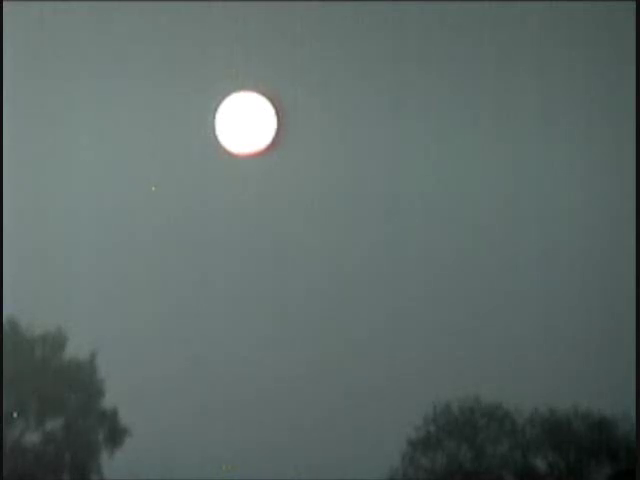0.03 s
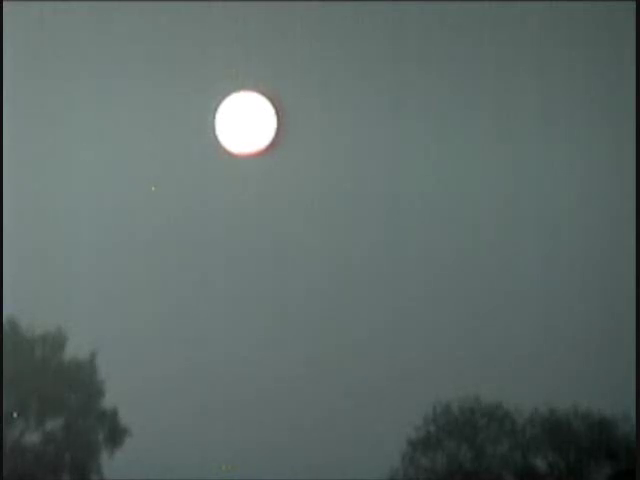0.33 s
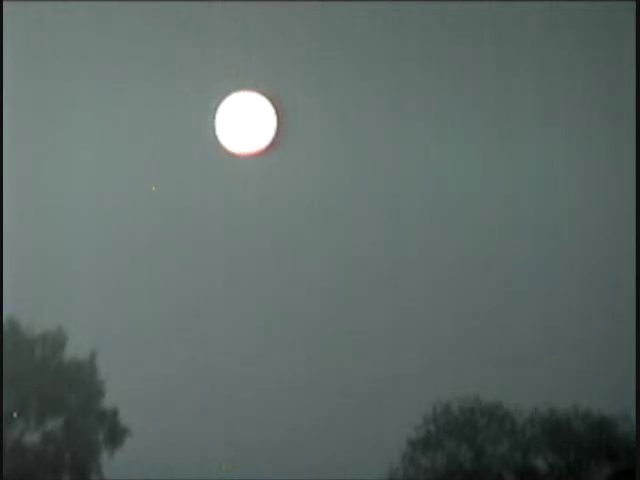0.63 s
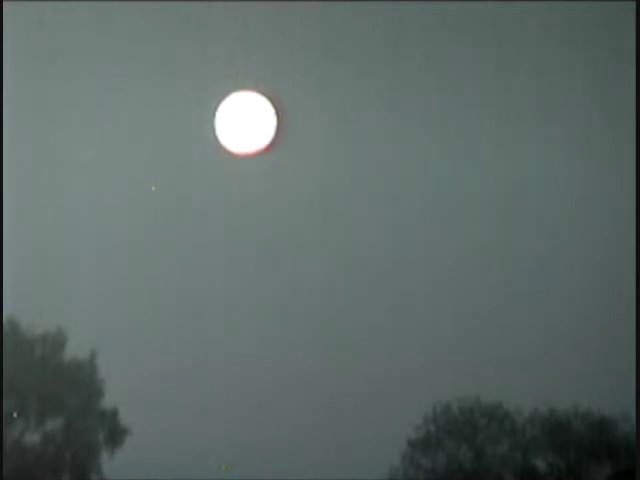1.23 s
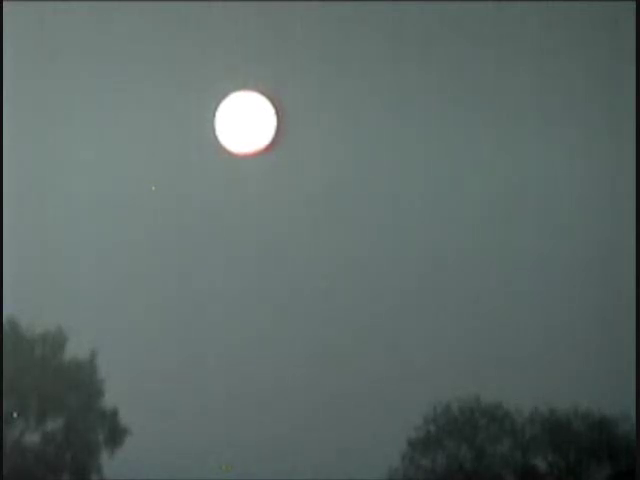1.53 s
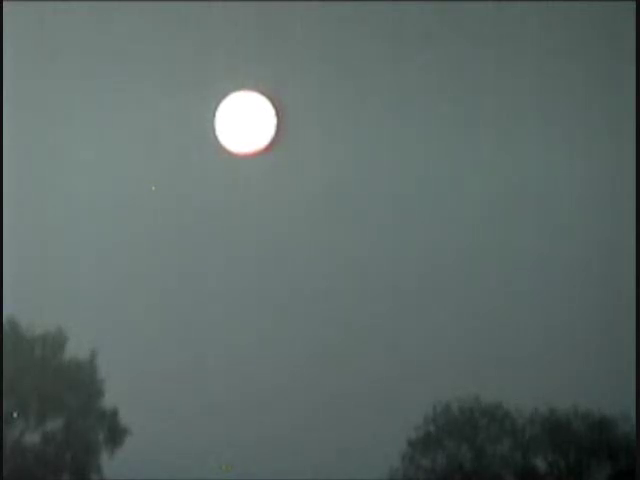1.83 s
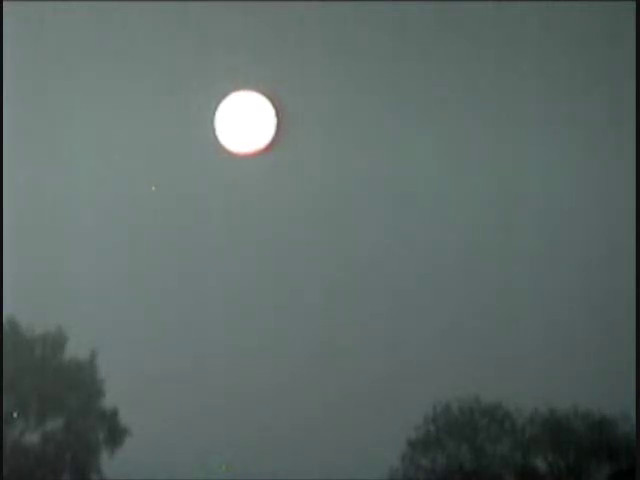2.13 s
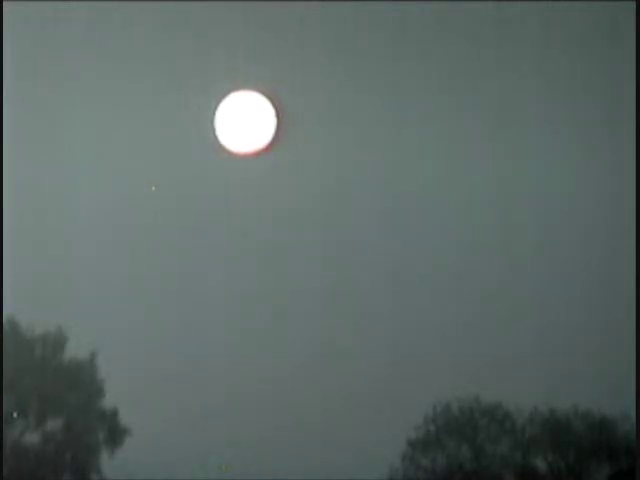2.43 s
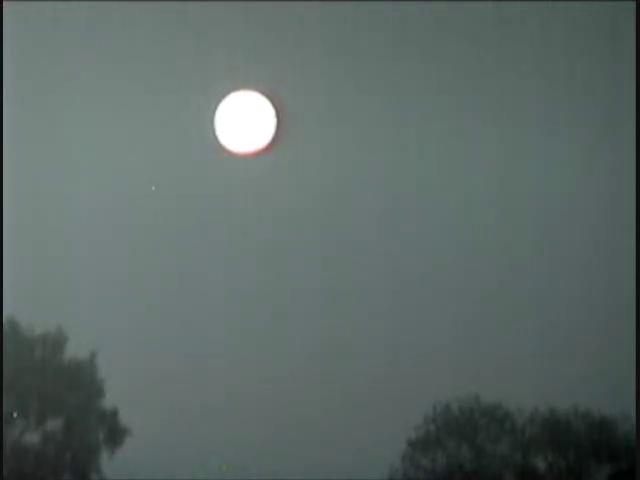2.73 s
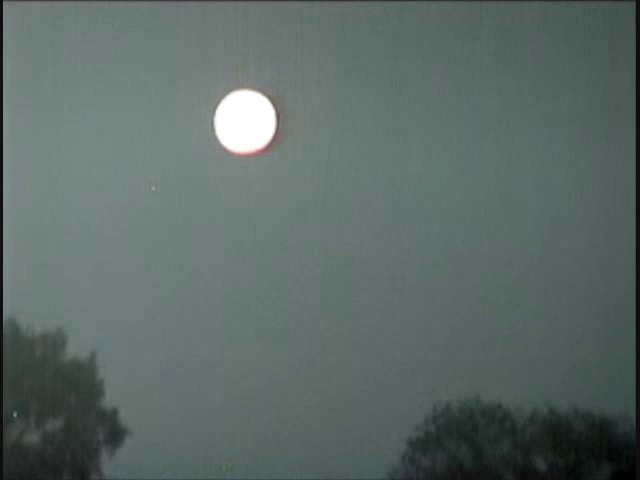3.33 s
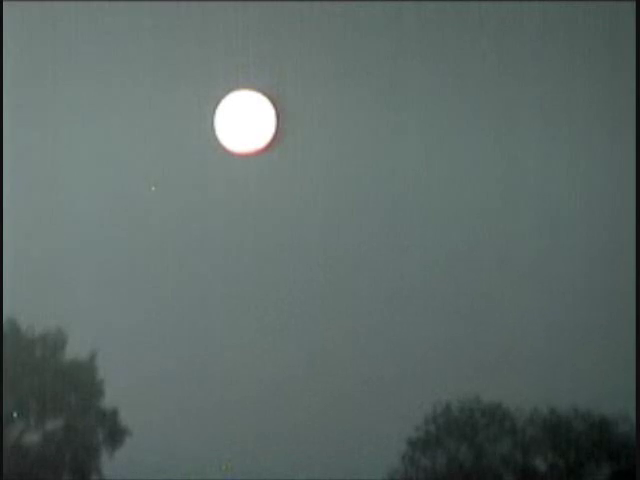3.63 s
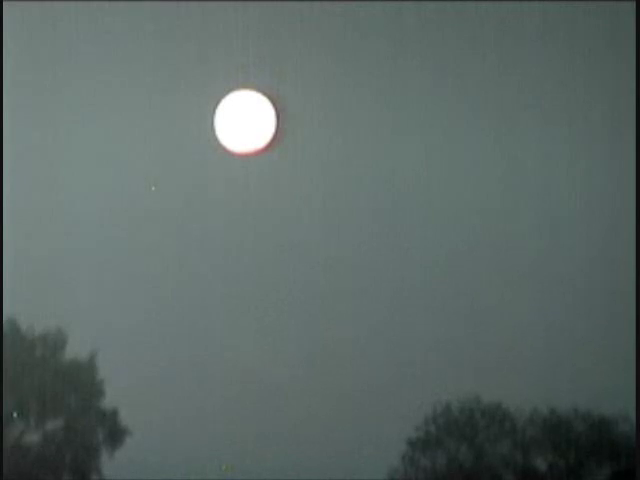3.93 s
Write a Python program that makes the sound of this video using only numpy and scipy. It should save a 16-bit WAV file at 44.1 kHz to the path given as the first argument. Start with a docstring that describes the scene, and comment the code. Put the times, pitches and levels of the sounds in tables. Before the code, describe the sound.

Frogs and insects buzz, whistle and trill over a dense distant chorus at night.

```python
"""Night chorus of frogs and insects

A near caller in the bush buzzes in loud bursts of falling chirps, and farther ones answer. Frogs whistle
and bloop in rising sweeps, trill in throat pulses and croak over a dense distant chorus; a far bird holds
one long hoot. Vegetation scatters the calls. Three low pops hit the microphone, and the narrow-band
recorder hums and limits the loudest bursts."""
import sys
import numpy as np
from scipy import signal
from scipy.fft import rfft, irfft, next_fast_len
from scipy.io import wavfile
from scipy.ndimage import uniform_filter1d, map_coordinates

SR = 44100
rng = np.random.default_rng(int(sys.argv[2]) if len(sys.argv) > 2 else 0)


def int16_out(signal):
    """Quantize to a 16-bit WAV file."""
    q = np.round(np.clip(np.atleast_2d(signal).T, -1, 1) * 32767)
    wavfile.write(sys.argv[1], SR, q.astype(np.int16))


N = 176400

# Slow envelopes of the low and high bands of the distant chorus: time_s, level_db
LOW_ENVELOPE = [(0, -45), (.3, -31.5), (.55, -25), (1.25, -32), (1.75, -35), (2.15, -31), (2.36, -35),
                (2.55, -25.5), (2.68, -36.5), (3.2, -30.5), (3.7, -28.5), (4, -25)]
HIGH_ENVELOPE = [(0, -27), (.2, -24.5), (.3, -19.5), (.5, -27), (.57, -20), (.7, -24.5), (.78, -22),
                 (.98, -24.5), (1.13, -24.5), (1.62, -24.5), (1.95, -28.5), (2.15, -21.5), (2.43, -22),
                 (2.52, -26), (2.72, -22), (3.1, -26.5), (3.43, -23), (3.6, -26.5), (4, -21)]
CHIRP_S, CHIRP_FALL_HZ = .0105, 553  # a narrow chirp
BLOOP_S = .075


def amp(db):
    """Amplitude ratio: tenfold for every 20 decibels."""
    return 10 ** (np.asarray(db) / 20)


def unit(x):
    """Normalisation to rms 1."""
    return x / np.sqrt(np.mean(x ** 2) + 1e-20)


def curves(rows):
    """Linear interpolation: one value per sample for each column after the time."""
    times, *columns = np.transpose(rows)
    return [np.interp(np.arange(N) / SR, times, column) for column in columns]


def wobble(rate):
    """Smooth random modulation: a spline through `rate` knots a second."""
    knots = rng.standard_normal(int(N * rate / SR) + 4)
    return map_coordinates(knots, [np.arange(N) * rate / SR])


def filtered(x, response):
    """Linear filtering: the spectrum is multiplied by a frequency response."""
    size = next_fast_len(N + SR // 2)
    return irfft(rfft(x, size) * response(np.fft.rfftfreq(size, 1 / SR)), size)[:N]


def noise(spectrum):
    """Spectral shaping of white noise, at rms 1; rows are frequency_hz, level_db."""
    knots_hz, db = np.transpose(spectrum)

    def response(hz):
        return amp(np.interp(np.log(hz + 1), np.log(knots_hz), db, right=-120))
    return unit(filtered(rng.standard_normal(N), response))


def ramp(length_s):
    """Normalised time: 0 to 1 over a duration."""
    return np.linspace(0, 1, max(int(length_s * SR), 8))


def arch(u, power):
    """A half-sine envelope, narrower at higher powers."""
    return np.abs(np.sin(np.pi * u)) ** power


def tone(hz):
    """A sine whose phase is the integral of its frequency."""
    return np.sin(2 * np.pi * np.cumsum(hz) / SR)


def add(out, start_s, sound):
    """Superposition: a sound joins the mix at a given time."""
    i = int(np.clip(round(start_s * SR), 0, N))
    out[i:i + len(sound)] += sound[:N - i]


def chorus_band(envelope, spectrum, flutter_db, flutter_rate):
    """Incoherent summation: many far callers merge into a fluttering band of noise."""
    db, = curves(envelope)
    return amp(db) * unit(noise(spectrum) * amp(flutter_db * wobble(flutter_rate)))


def distant_chorus():
    """Amplitude modulation: three bands of far callers swell and fade independently."""
    # Band spectra: frequency_hz, level_db
    low_spectrum = [(500, -34.5), (680, -6), (780, -4.5), (1100, -2), (1600, -2), (1950, -7.5), (2300, -12),
                    (3000, -43.5)]
    mid_spectrum = [(2000, -25), (2400, -5), (2650, -2.5), (3000, -1.5), (3300, -6.5), (3700, -41)]
    high_spectrum = [(3000, -40.5), (3500, -6.5), (4050, 3), (4500, -2.5), (5050, -3.5), (5450, -8.5),
                     (5750, -7.5), (6150, -17.5)]
    # Slow envelope of the middle band: time_s, level_db
    mid_envelope = [(0, -24.5), (.4, -26), (.6, -34.5), (.82, -24), (1.05, -25.5), (1.22, -23.5),
                    (1.35, -29.5), (1.78, -26.5), (2.45, -29), (3.7, -26.5), (4, -27.5)]
    low = chorus_band(LOW_ENVELOPE, low_spectrum, flutter_db=4.5, flutter_rate=90)
    mid = chorus_band(mid_envelope, mid_spectrum, flutter_db=3, flutter_rate=40)
    high = chorus_band(HIGH_ENVELOPE, high_spectrum, flutter_db=1.5, flutter_rate=160)
    return low + amp(.5) * mid + amp(-1.5) * high


def far_bloops(per_s=45, gain_db=-7.5):
    """Random superposition of small rising notes under the envelope of the low chorus."""
    out, u = np.zeros(N), ramp(BLOOP_S / 2)
    for when, pitch, size in rng.random((int(per_s * N / SR), 3)):
        hz = 700 * 2.4 ** pitch * (1 + .22 * u)
        add(out, when * N / SR, (.5 + size) * arch(u, .7) * tone(hz))
    db, = curves(LOW_ENVELOPE)
    return amp(db + gain_db) * unit(out)


def far_chirps(per_s=220, gain_db=-3.5):
    """Random superposition of falling chirps under the envelope of the high chorus."""
    out, u = np.zeros(N), ramp(CHIRP_S)
    for when, pitch, size in rng.random((int(per_s * N / SR), 3)):
        hz = 4800 + 700 * pitch - CHIRP_FALL_HZ * u
        add(out, when * N / SR, size ** 2 * arch(u, .8) * tone(hz))
    db, = curves(HIGH_ENVELOPE)
    return amp(db + gain_db) * unit(out)


def mains_hum():
    """Steady partials near the mains frequency and its next two harmonics."""
    # Hum partials: frequency_hz, level_db
    partials = [(49.5, -46.5), (100, -48), (150, -50.5)]
    return sum(np.sqrt(2) * amp(db) * tone(np.full(N, hz)) for hz, db in partials)


def night_air(level_db=-36):
    """Stationary broadband noise, strongest in the bass."""
    # Spectrum of the air: frequency_hz, relative_db
    spectrum = [(20, -14), (50, 4), (90, -16.5), (200, -5.5), (1000, -10.5), (2000, -12.5), (4000, -17.5),
                (5800, -29)]
    return amp(level_db) * noise(spectrum)


def chirp(top_hz, wide):
    """Frequency sweep: a narrow chirp (wide=0) arches; a wide one (1) falls far, weakens and splits."""
    wide_s, wide_fall_hz, wide_lift_hz, sag_db = .0185, 998, 293, 6
    crest_at, break_at, break_width = .32, .55, .07  # shares of the chirp's length
    u = ramp(CHIRP_S + wide * (wide_s - CHIRP_S))
    narrow_fall = CHIRP_FALL_HZ * ((u - crest_at) / (1 - crest_at)) ** 2
    wide_fall = wide_fall_hz * arch(np.minimum(1.15 * u, 1) ** 1.4 / 2, 2) - wide_lift_hz
    gap = np.exp(-((u - break_at - rng.normal(0, .04)) / break_width) ** 2)
    envelope = (1 - wide) * arch(u, 1.4) + wide * arch(u, .76) * amp(-sag_db * u)
    return envelope * (1 - wide * gap) * tone(top_hz - (1 - wide) * narrow_fall - wide * wide_fall)


def buzzes():
    """Fast chirp trains fuse into buzzes; the fainter the caller, the greater its share of scatter."""
    # Bursts: start_s, end_s, chirps_per_s, level_db, top_pitch_hz, half_widened_at_s
    bursts = [(.0275, .19, 58.4, -1, 5020, .4), (1.2385, 1.578, 57.6, 3, 5030, 1.38),
              (2.8388, 3.005, 58, 3, 5020, 3.2), (3.152, 3.385, 58.1, 3, 5000, 3.18),
              (.232, .43, 58, -15, 5250, .6), (.545, .722, 63, -13, 5050, .6),
              (.856, 1.08, 60.3, -12, 5300, .98), (2.062, 2.245, 63.3, -13, 5200, 2.18),
              (2.269, 2.458, 61, -11, 5170, 2.33), (3.39, 3.488, 60, -12, 5150, 3.42),
              (3.835, 4, 57, -14, 5100, 3.93)]
    warm_s, warm_db, warm_hz = .024, 12.5, 403  # a burst starts soft and low
    widen_s, wide_lead_s = .08, .00028  # a wide chirp starts slightly earlier
    gain_db, jitter_hz = 2.5, 25
    out = np.zeros(N)
    for start, end, rate, db, top_hz, widen_at in bursts:
        burst = np.zeros(N)
        for s in np.arange(start, end, 1 / rate):
            cold = np.exp(-((s - start) / warm_s) ** 2)
            wide = np.clip(.5 + (s - widen_at) / widen_s, 0, 1)
            note = chirp(top_hz - warm_hz * cold + rng.normal(0, jitter_hz), wide)
            gain = amp(gain_db + db - warm_db * cold + rng.normal(0, .91))
            add(burst, s - wide_lead_s * wide, gain * note)
        out += bush(burst, wet_db=-18 - .65 * db)
    return out


def reflected(x):
    """Comb filtering: echoes off the ground and a trunk interfere with the direct sound."""
    # Echo paths: delay_s, gain
    echoes = [(.0031, .17), (.0078, .14)]
    out = x.copy()
    for delay_s, gain in echoes:
        add(out, delay_s, gain * x)
    return out


def bush(x, wet_db, t60_s=.11, build_s=.012):
    """Scattering by vegetation adds a short, exponentially decaying tail to the direct sound."""
    t = np.arange(SR // 2) / SR
    tail = rng.standard_normal(len(t)) * amp(-60 * t / t60_s) * (1 - np.exp(-t / build_s))
    return x + amp(wet_db) * signal.fftconvolve(x, tail / np.linalg.norm(tail))[:N]


def ticks(top_hz=6043, fall_hz=1090, length_s=.02, lead_s=.0079, gain_db=1.5):
    """Linear downward sweeps: another caller's higher chirps, spaced widely enough to be heard singly."""
    # Single chirps: time_s, level_db
    calls = [(0.1448, -18.5), (0.198, -14.5), (0.2622, -16), (0.2978, -18), (0.3406, -16.5), (0.378, -15),
             (0.8593, -17), (0.8883, -17.5), (0.915, -20), (0.9483, -17), (0.9872, -13), (1.0241, -14.5),
             (1.0698, -18.5), (1.6203, -19), (1.6675, -17.5), (2.03, -16.5), (2.0634, -14), (2.1, -17.5),
             (2.1405, -17.5), (2.1807, -18), (2.2216, -14.5), (2.5676, -18), (2.5949, -20), (2.6243, -16),
             (2.6624, -17), (2.702, -18), (2.7402, -17.5), (2.7834, -17), (3.4161, -14), (3.457, -16.5),
             (3.9693, -18), (3.9944, -19.5)]
    out, u = np.zeros(N), ramp(length_s)
    for s, db in calls:
        add(out, s - lead_s, amp(db + gain_db) * arch(u, 1.6) * tone(top_hz - fall_hz * u))
    return out


def whistle(length_s, hz, rise_hz=320):
    """A rising glide, loudest early, roughened by fast random amplitude modulation."""
    u = ramp(length_s)
    envelope = arch(u ** .57, 1.5) * amp(1.7 * wobble(260)[:len(u)])
    return envelope * tone(hz + rng.normal(0, 35) + rise_hz * (u ** .664 - .55))


def whistles(near_hz=2573, far_hz=2824, far_per_s=18):
    """Superposition of whistling frogs: a few near calls and many faint ones at random times."""
    # Near whistles: start_s, length_s, level_db
    calls = [(0.176, 0.056, -10.5), (0.533, 0.056, -17), (0.821, 0.062, -10), (1.195, 0.06, -19.5),
             (1.504, 0.049, -12.5), (1.74, 0.06, -20), (2.132, 0.055, -10), (3.078, 0.05, -10),
             (3.784, 0.042, -9.5), (3.936, 0.052, -19.5)]
    out = np.zeros(N)
    for s, length_s, db in calls:
        add(out, s, amp(db + 1) * whistle(length_s, near_hz))
    for when, pitch, size in rng.random((int(far_per_s * N / SR), 3)):
        add(out, when * N / SR, amp(-28 + 6.3 * size) * whistle(.055, far_hz + 400 * (pitch - .5)))
    return out


def trills(longest_pulse_s=.024):
    """Pulsed excitation of one throat resonance; each train of rounded pulses swells and fades."""
    # Pulse trains: first_pulse_s, end_s, pulses_per_s, pitch_hz, level_db, roughness (0 to 1)
    trains = [(.325, 1.31, 33.3, 1048, -18.5, .25), (2.234, 2.464, 37.4, 1204, -3.5, 0.06),
              (2.487, 2.616, 38, 797, -17.5, 0.3), (2.714, 2.857, 75, 767, -18.5, 0.1),
              (2.881, 3.277, 72, 771, -19, 0.2), (3.26, 3.335, 41, 777, -16.5, 0.2),
              (3.351, 3.619, 47.7, 1192, -18.5, 0.4)]
    out = np.zeros(N)
    for start, end, rate, hz, db, rough in trains:
        u = ramp(min(longest_pulse_s, 1.1 / rate))
        for s in np.arange(start, end, 1 / rate):
            progress = (s - start + .018 / rate) / (end - start + .5 / rate)
            swell = arch(progress ** .73, .38)
            detune = .13 * rough * rng.normal()
            glide = .3 * rough * rng.normal() * (u - .5)
            pulse = arch(u, 1.2) * tone(hz * (1 + detune + glide))
            add(out, s - len(u) / SR / 2, amp(db + rng.normal(0, 1.5)) * swell * pulse)
    return out


def bloops(from_hz=880, to_hz=2152, flutter_db=4.4):
    """Fast upward sweeps of more than an octave sound liquid; their level flutters at random."""
    # Bloops: start_s, level_db
    calls = [(.352, -28), (.428, -19.5), (0.558, -26.5), (1.098, -20), (1.236, -29.5), (1.44, -24.5),
             (1.746, -31), (1.884, -22.5), (2.083, -25), (2.4, -22), (2.5, -21), (3.428, -26), (3.811, -30),
             (3.915, -21.5)]
    out, u = np.zeros(N), ramp(BLOOP_S)
    for s, db in calls:
        add(out, s, amp(db) * arch(u, .29) * tone(from_hz + (to_hz - from_hz) * u ** 1.15))
    return out * amp(flutter_db * wobble(210))


def croaks(pulse_depth=.46):
    """Source and filter: pulsing breath noise in a broad throat resonance makes a hoarse, far croak."""
    # Croaks: start_s, end_s, pulses_per_s, resonance_hz, width_hz, level_db
    calls = [(.45, 1.05, 34, 1300, 820, -24.5), (1.38, 1.774, 45, 1093, 770, -24),
             (1.568, 1.976, 120, 3990, 794, -25), (2.722, 3.28, 73, 935, 381, -23.5),
             (3.337, 3.64, 60, 1190, 328, -23.5)]
    out = np.zeros(N)
    for start, end, rate, hz, width_hz, db in calls:
        def resonance(f):
            return 1 / (1 + ((f * f - hz * hz) / (1.15 * width_hz * f + 1)) ** 4)
        u = ramp(end - start)
        throat = unit(filtered(rng.standard_normal(N), resonance))[:len(u)]
        pulsing = 1 + pulse_depth * tone(rate * (1 + .075 * wobble(18)[:len(u)]))
        add(out, start, amp(db) * arch(u ** .66, .64) * unit(pulsing * throat))
    return out


def held_note(contour):
    """Slight random amplitude and frequency modulation of a pure tone on a slow glide."""
    hz, db = curves(contour)
    t = np.arange(N) / SR
    sounding = (t > contour[0][0]) & (t < contour[-1][0])
    envelope = np.sqrt(2) * amp(db) * amp(1.9 * wobble(45)) * sounding
    return envelope * tone(hz * (1 + .0085 * wobble(50)))


def drone():
    """A faint low tone swells and fades under a slow envelope."""
    # Course of the tone: time_s, pitch_hz, level_db
    contour = [(.9, 147.8, -51.5), (1.95, 147.8, -41), (2.3, 145.7, -53.5)]
    return held_note(contour)


def rasps(stroke_s=.013):
    """Gated noise in one high resonance: the scratchy strokes of a rasping caller."""
    # Strokes: start_s, level_db
    strokes = [(1.588, -13.5), (1.604, -13.5), (1.622, -16), (1.638, -12.5), (1.671, -14), (1.727, -12.5),
               (1.775, -20.5), (1.831, -16.5), (1.876, -18), (1.922, -18.5)]
    # The resonance: frequency_hz, relative_db
    spectrum = [(3000, -28.5), (3550, -4.5), (3800, -2), (4200, 2), (4500, -8.5), (5200, -31)]
    envelope = np.zeros(N)
    for s, db in strokes:
        add(envelope, s, amp(db) * arch(ramp(stroke_s) ** .5, .38))
    return envelope * noise(spectrum)


def pops(snap_s=.0008, swing_hz=55.5, decay_s=.0062):
    """A heavily damped low oscillation follows a snap of suction at the microphone."""
    # Pops: start_s, level_db
    hits = [(2.5074, 3), (3.1702, 0.5), (3.7857, 0)]
    out, t = np.zeros(N), np.arange(SR // 10) / SR
    snap = -arch(ramp(snap_s), .93)
    swing = np.cos(2 * np.pi * swing_hz * t) * np.exp(-t / decay_s) * (1 - np.exp(-t / .000067))
    for s, db in hits:
        add(out, s, amp(db) * np.concatenate([snap, .65 * swing]))
    return out


def hoot():
    """A nearly pure tone: a far bird's long, slowly rising hoot."""
    # Course of the hoot: time_s, pitch_hz, level_db
    contour = [(3.42, 477.4, -41.5), (3.53, 487, -34), (3.72, 504, -24), (3.82, 508, -30.5),
               (3.91, 516.6, -31.5), (4, 528, -19.5)]
    return held_note(contour)


def piping_note():
    """A short, higher tone whose frequency and amplitude peak together."""
    # Course of the note: time_s, pitch_hz, level_db
    contour = [(3.71, 1385, -39.5), (3.77, 1405, -16.5), (3.81, 1395, -35)]
    return held_note(contour)


def scene():
    """Linear superposition of the callers, the pops and the background in one channel."""
    near = reflected(buzzes()) + bush(ticks(), wet_db=-7.5)
    near += bush(trills(), wet_db=-12) + bush(whistles(), wet_db=-4.5)
    far = bush(bloops() + rasps(), wet_db=-2) + croaks()
    notes = hoot() + piping_note() + drone()
    thumps = bush(pops(), wet_db=-12.5)
    background = distant_chorus() + far_bloops() + far_chirps() + mains_hum() + night_air()
    return (near + far + notes + thumps + background)[None]


def record(dry):
    """Fast limiting and a narrow band; clipping of the highest peaks adds a little dull distortion."""
    limit, knee, ceiling = .96, 7.5, .89
    band_hz, dull_hz, top_hz = 6132, 8800, 16000
    envelope = np.abs(signal.hilbert(dry[0]))
    gain = uniform_filter1d((1 + (envelope / limit) ** knee) ** (-1 / knee), size=16)
    narrow = filtered(dry[0] * gain, lambda hz: hz < band_hz)
    clipped = np.clip(narrow, -ceiling, ceiling)
    return filtered(clipped, lambda hz: (hz < top_hz) / np.sqrt(1 + (hz / dull_hz) ** 6))[None]


dry = scene()
out = record(dry)
int16_out(out)
```